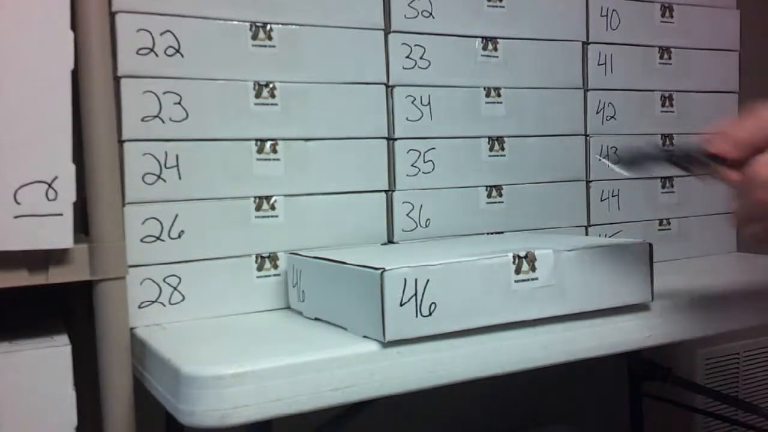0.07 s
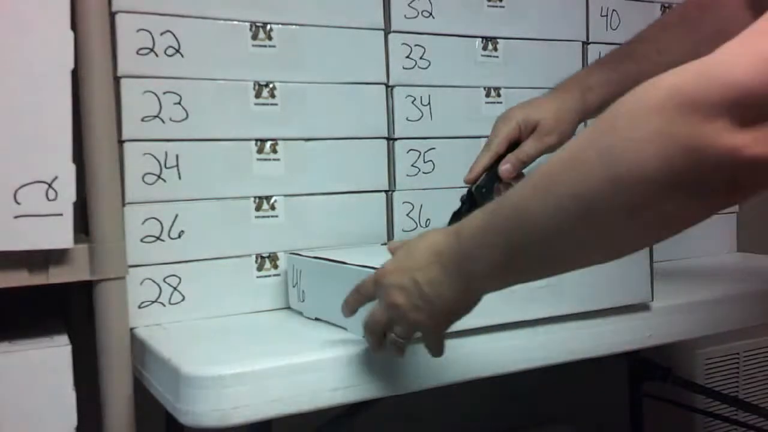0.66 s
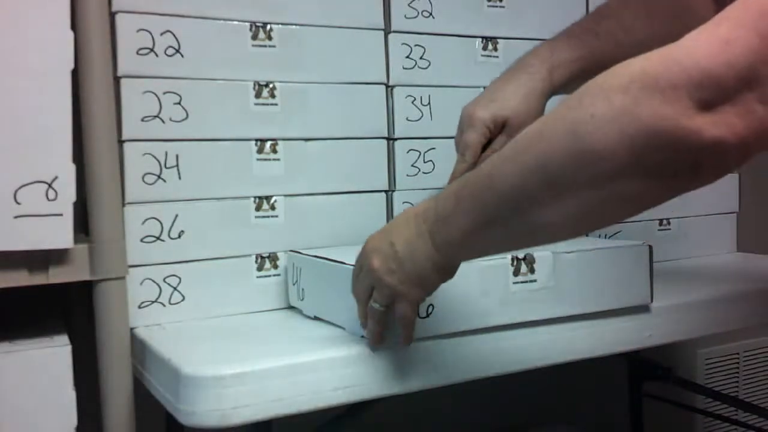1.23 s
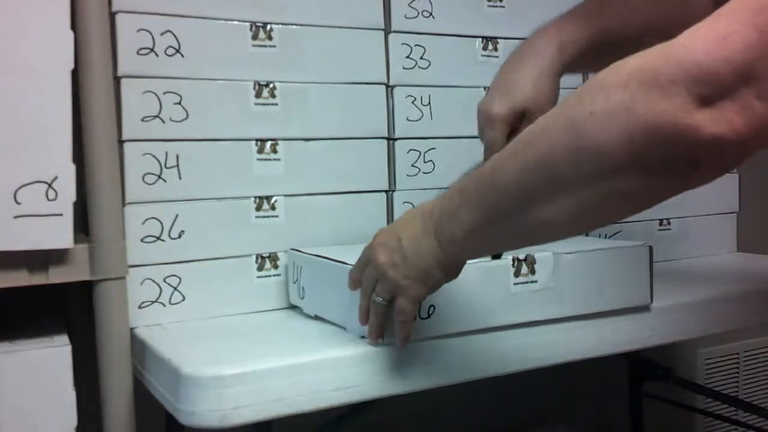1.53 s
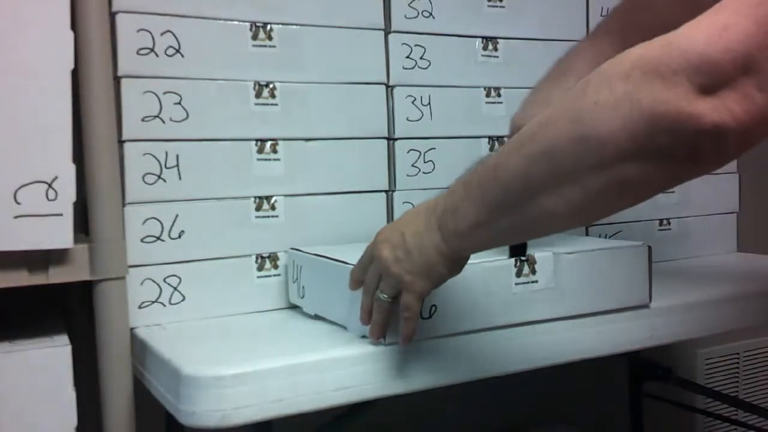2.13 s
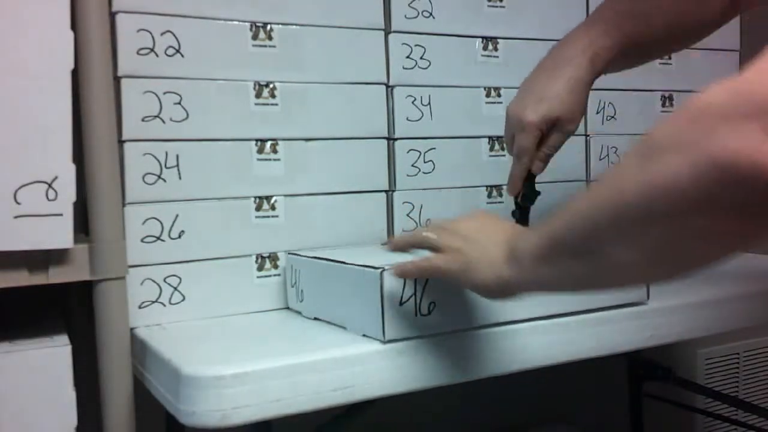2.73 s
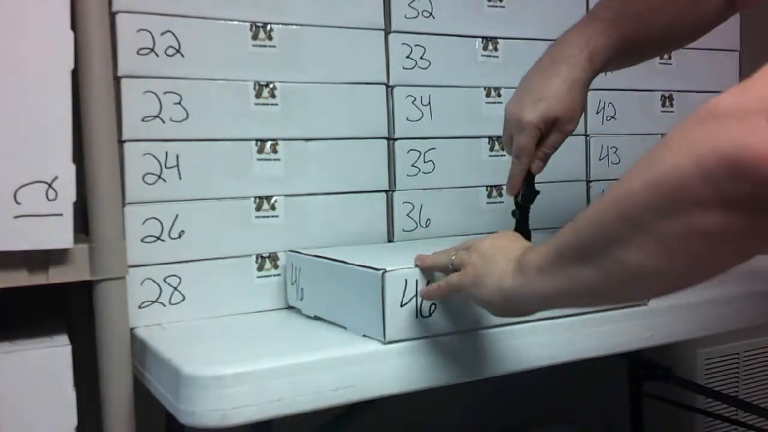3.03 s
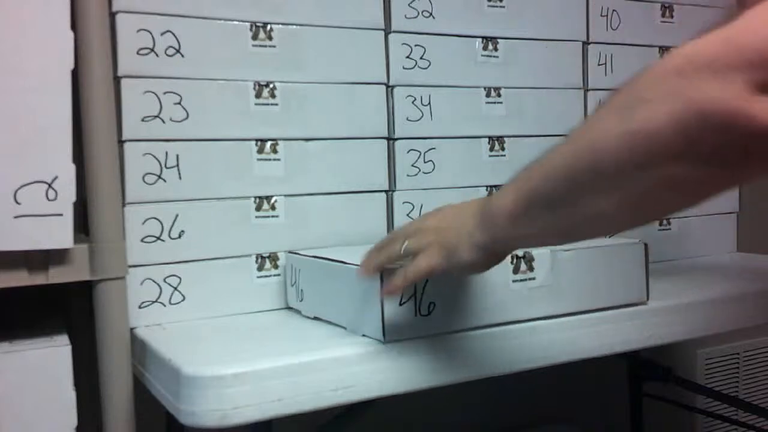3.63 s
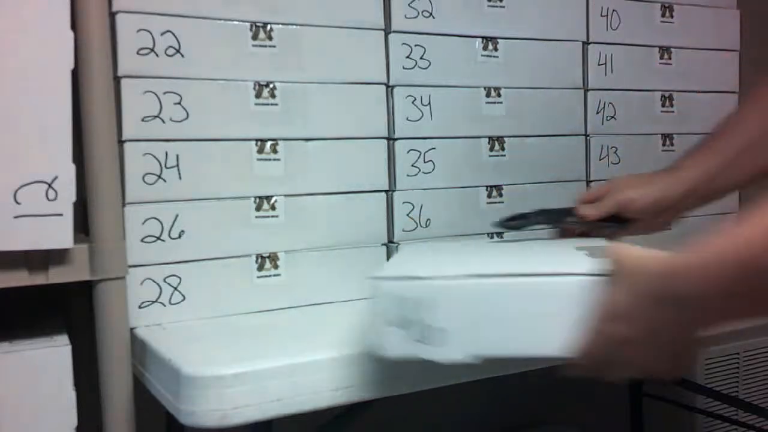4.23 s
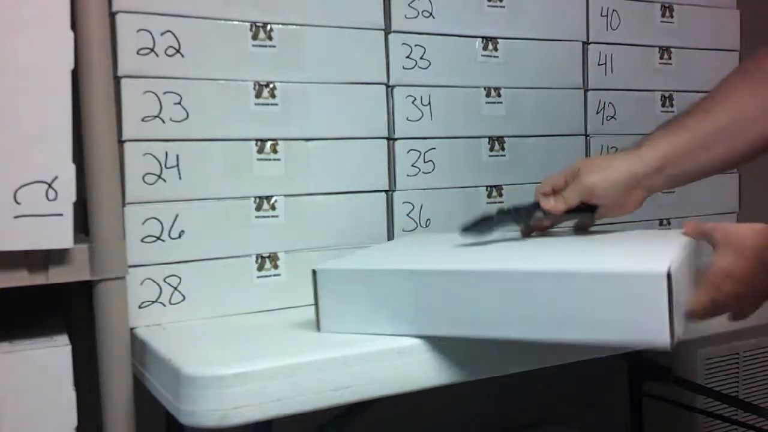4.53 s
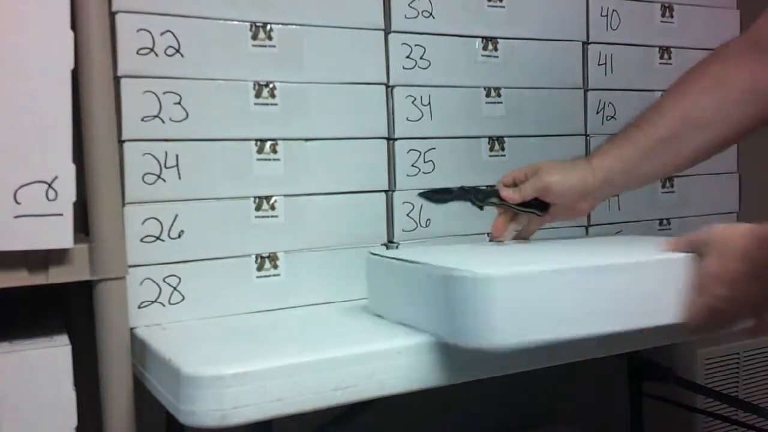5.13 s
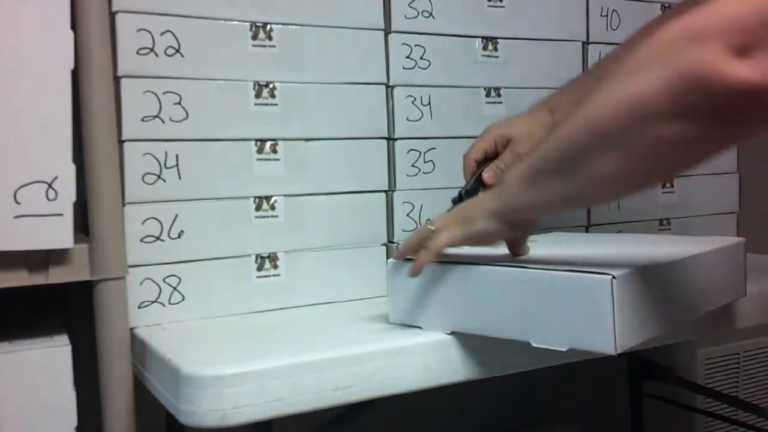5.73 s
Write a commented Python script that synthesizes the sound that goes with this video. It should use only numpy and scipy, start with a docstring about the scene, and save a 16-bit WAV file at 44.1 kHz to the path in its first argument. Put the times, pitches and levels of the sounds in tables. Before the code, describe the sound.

A hand softly rubs a shallow cardboard box, then a knife slits its tape in short rasps and goes through the seam with a hollow pop. After a few smaller cuts and a lull, the box is swung round on a plastic table in several louder scraping pushes, with bumps and brief squeaks. It is all close to the microphone in a small room with a faint fan hum.

```python
"""A shallow cardboard box, slit open and swung round on a plastic table, close to one microphone.
A hand steadies the box while a knife slits its tape and pops through the seam; then the box goes
round in several scraping pushes, bumping down between them. Fibres catch and slip to make the rasp,
and the walls and the table top ring under each bump. The place is a small store room with a short
echo; a fan hums in the background, over the microphone's faint hiss."""
import sys
import numpy as np
from scipy import signal
from scipy.fft import rfft, irfft, next_fast_len
from scipy.io import wavfile

SR = 44100
rng = np.random.default_rng(int(sys.argv[2]) if len(sys.argv) > 2 else 0)


def file_out(sig):
    """Save sig as 16-bit WAV at sys.argv[1]."""
    # one column per channel
    cols = np.atleast_2d(sig).T
    # limit, then scale
    lim = np.clip(cols, -1, 1)
    pcm = np.round(lim * 32767).astype(np.int16)
    wavfile.write(sys.argv[1], SR, pcm)


N = 255339
TIME = np.arange(N) / SR


def from_db(db):
    """Decibels to gain."""
    return 10 ** (np.asarray(db) / 20)


def unit_rms(x):
    """Scale to an rms of 1."""
    return x / np.sqrt(np.mean(x ** 2) + 1e-20)


def at_hz(points, hz):
    """Read a table on a log-frequency axis."""
    points = np.array(points)
    return np.interp(np.log(hz + 1e-6), np.log(points[:, 0]), points[:, 1])


def butter(x, hz, kind, order=2):
    """Butterworth filter."""
    sections = signal.butter(order, np.clip(hz, 10, .45 * SR), kind, fs=SR, output="sos")
    return signal.sosfilt(sections, x + 1e-18)


def coloured(x, spectrum):
    """Give a steady excitation a spectrum, at an rms of 1."""
    size = next_fast_len(N)
    hz = np.arange(size // 2 + 1) * SR / size
    shaped = rfft(x, size) * from_db(at_hz(spectrum, hz))
    return unit_rms(irfft(shaped, size)[:N])


def drift(per_s):
    """A random wander with a spread near 1."""
    knots = rng.standard_normal(6000)
    return np.interp(TIME * per_s, np.arange(len(knots)), knots)


def swell(middle_s, length_s):
    """A bell-shaped rise and fall."""
    return np.exp(-np.minimum((2 * (TIME - middle_s) / length_s) ** 2, 20))


def narrow_noise(phase, width_hz):
    """A resonance fed by friction: its strength and phase wander."""
    return drift(width_hz) * np.sin(phase) + drift(width_hz) * np.cos(phase)


def ring(force, modes):
    """Damped modes in parallel, in alternating phase; their levels count relative to each other."""
    out = 0
    for k, (hz, db, t60) in enumerate(modes):
        radius, angle = from_db(-60 / (t60 * SR)), 2 * np.pi * hz / SR
        feedback = [1, -2 * radius * np.cos(angle), radius * radius]
        mode = signal.lfilter([.5, 0, -.5], feedback, force + 1e-18)
        out += (-1) ** k * from_db(db) * mode
    return out / np.sqrt(sum(from_db(db) ** 2 for _, db, _ in modes))


def diffuse_echo(t60s, onset_s=0.00088):
    """An enclosure's response, of unit energy: octave bands of noise, each with its own decay."""
    t = TIME[:SR // 2]
    edges_hz = 60 * 2. ** np.arange(10)
    out = 0
    for low, high in zip(edges_hz, edges_hz[1:]):
        band = butter(rng.standard_normal(len(t)), (low, high), "band")
        out += band * from_db(-60 * t / at_hz(t60s, np.sqrt(low * high)))
    out *= 1 - np.exp(-t / onset_s)
    return out / np.sqrt(np.sum(out ** 2))


# Noise floor of the microphone: f/Hz, relative density/dB
MIC_HISS = [(1760, -33), (3000, -31), (3620, -4), (3960, -12), (5450, -11.5), (7600, -17.5), (8210, -10),
            (15800, -4.5)]

def microphone_hiss(level_db=-71.5):
    """The microphone's own noise, even and high."""
    hiss = coloured(rng.standard_normal(N), MIC_HISS)
    return from_db(level_db) * unit_rms(butter(hiss, 2600, "high", order=4))


# The fan, in the background of the store room. Its hum: f/Hz, relative level/dB
FAN_HUM = [(236.9, -73.5), (296.1, -67.5), (360.7, -77), (419.9, -77.5), (479.1, -78), (656.8, -76.5),
           (952.8, -114), (1432, -76), (1491, -76.5), (1556, -83), (1852, -83.5), (2444, -77.5)]
# Its rush of air: f/Hz, relative density/dB
FAN_RUSH = [(18, -40), (30, -24), (59, -12.5), (204, -13), (233, -3), (268, -20), (301, -5.5), (325, -18),
            (352, -4.5), (388, -13.5), (481, -11), (972, -13.5), (1140, -18), (1460, -14.5), (3200, -19.5),
            (4160, -64), (7040, -120)]

def fan(hum_db=-2.0, waver_db=-4.0, rush_db=-65.5):
    """A fan hums in wavering tones over a dull rush of air."""
    hum = 0
    for hz, db in FAN_HUM:
        gain = from_db(db + hum_db + waver_db * drift(3.48))
        phase = 2 * np.pi * hz * TIME + .5 * drift(2.6)
        hum += gain * np.sqrt(2) * np.sin(phase)
    rush = coloured(rng.standard_normal(N), FAN_RUSH)
    return hum + from_db(rush_db) * butter(rush, 2720, "low", order=6)


# A fingertip on a wall of the box: middle t/s, length/s, f/Hz at full force, level/dB
FINGER_GROANS = [(0.924, 0.07, 295, -37), (0.993, 0.048, 300, -51.5), (1.089, 0.034, 306, -52.5),
                 (1.144, 0.027, 285, -56.5), (1.179, 0.021, 340, -51)]

def finger_groans(waver=0.061, sag=0.11, octave_db=-29):
    """Stick-slip locks to a wall mode: an almost pure tone whose pitch sags as the force fades."""
    unsteady = 1 + waver * drift(100)
    out = 0
    for s, length, hz, db in FINGER_GROANS:
        force = swell(s, length)
        pitch_hz = hz * unsteady * (1 - sag * (1 - force))
        phase = 2 * np.pi * np.cumsum(pitch_hz) / SR
        tone = np.sin(phase) + from_db(octave_db) * np.sin(2 * phase)
        out += from_db(db) * force * np.sqrt(2) * tone
    return out


# Blade on tape and board on plastic: middle t/s, length/s, f/Hz, width/Hz, level/dB
FRICTION_SQUEAKS = [(0.788, 0.08, 2200, 995, -61), (1.17, 0.097, 3000, 130, -61.5),
                    (1.2, 0.13, 3400, 109.3, -71), (1.508, 0.015, 1210, 400, -34),
                    (1.525, 0.013, 2500, 406, -33), (2.67, 0.033, 795, 159.8, -39),
                    (4.447, 0.18, 1270, 119.3, -52), (4.589, 0.04, 1620, 300, -52),
                    (4.644, 0.033, 3500, 1000, -39), (4.773, 0.083, 1273, 199.4, -47),
                    (4.81, 0.22, 3350, 301.6, -62), (4.948, 0.06, 2585, 548, -29),
                    (4.943, 0.048, 4870, 700, -39.5), (4.96, 0.096, 1354, 129, -38.5),
                    (4.952, 0.065, 6800, 910, -43.5), (5.117, 0.023, 880, 111.3, -28)]

def squeaks():
    """For a moment the slips gather round one pitch and ring in a narrow, unsteady band."""
    return sum(from_db(db) * swell(s, length) * narrow_noise(2 * np.pi * hz * TIME, width_hz)
               for s, length, hz, width_hz, db in FRICTION_SQUEAKS)


# The blade's tip touching the box: t/s, relative level/dB
BLADE_TICKS = [(2.188, -30), (3.211, -35), (3.224, -39.5)]
# The board's higher modes: f/Hz, relative level/dB, t60/s
BOARD_MODES = [(740, 0.5, 0.093), (1005, -11.5, 0.15), (1114, 1.5, 0.13), (1217, 2, 0.051),
               (1960, -5.5, 0.063), (2250, -9, 0.098), (2950, -7, 0.088), (3100, -16, .09),
               (4030, -26, .07)]

def blade_ticks(ring_db=-6, scratch_db=-9, scratch_s=0.013, fibres_db=-19):
    """A hard point rings the board, with a brief scratch and a thin hiss of fibres."""
    clicks = np.zeros(N)
    for s, db in BLADE_TICKS:
        clicks[round(s * SR)] = from_db(db)
    decay = signal.lfilter([1], [1, -np.exp(-1 / (scratch_s * SR))], clicks + 1e-18)
    friction = decay * slips(spread_db=1.7)
    ringing = from_db(ring_db) * ring(clicks, BOARD_MODES)
    scratch = from_db(scratch_db) * butter(friction, (650, 3200), "band", order=1)
    fibres = from_db(fibres_db) * butter(friction, 9000, "high", order=1)
    return butter(ringing + scratch, 3800, "low") + fibres


def flex(hz, rise_s, delay_s=0):
    """A struck spot gives: its swing builds up and dies within a few cycles."""
    t = np.maximum(TIME[:SR // 10] - delay_s, 0)
    return (t / rise_s) ** 2 * np.exp(2 - 2 * t / rise_s) * np.sin(2 * np.pi * hz * t)


# Modes of the box walls and of the table top under them: f/Hz, relative level/dB, t60/s
WALL_MODES = [(178.4, 2, 0.091), (184, 3.5, 0.13), (206.6, 7, 0.13), (247.9, 7, 0.098), (288, -4.5, 0.091),
              (342.4, 3, 0.12), (425, -9, 0.11), (550, -7.5, 0.037), (664, -14.5, 0.089), (692, 3.5, .07),
              (816, 6.5, 0.15), (1010, -34, .1), (1380, -27, 0.15)]
TABLE_MODES = [(64, -27, .2), (82.7, 16, 0.09), (97, -7.5, 0.13), (141, 9, 0.068)]
# Hand, blade and table knocking the box: t/s, level/dB, flexing f/Hz, table thump level/dB
BOX_BUMPS = [(0.86, -40.5, 250, -66), (0.884, -38.5, 175, -51), (1.527, -31.5, 200, -39),
             (1.558, -27.5, 367, -51), (1.819, -37.5, 220, -42), (1.863, -42, 314, -65),
             (1.971, -28, 240, -70), (1.982, -27.5, 304, -64), (2.004, -25, 734, -54),
             (2.0104, -18.5, 246, -50), (2.019, -16, 342, -31), (2.041, -25.5, 297, -40),
             (2.092, -23, 300, -39), (2.209, -36.5, 230, -33), (2.253, -44, 257, -59),
             (2.34, -44.5, 244, -70), (2.612, -41.5, 208, -56), (2.861, -43, 249, -57),
             (2.982, -43, 279, -68), (3.469, -48, 246, -75), (3.718, -49, 206, -50.5),
             (3.861, -23, 217, -28.5), (3.906, -37, 177, -45), (4.077, -32.5, 230, -36),
             (4.205, -26, 227, -42), (4.636, -25, 230, -22.5), (4.661, -17.5, 643, -41),
             (4.672, -15.5, 255, -23.5), (4.682, -25.5, 405, -36), (4.72, -37, 184, -37),
             (4.975, -30, 457, -52), (4.977, -19.5, 232, -28.5), (5.012, -22.5, 274, -54),
             (5.192, -40, 240, -45), (5.504, -35.5, 280, -68), (5.518, -32, 216, -52),
             (5.735, -54.5, 259, -42.5)]

def bumps(rise_s=0.0042, settle_db=-6.5, table_hz=86, wall_ring_db=-41.5, table_ring_db=-44.0):
    """The spot that is hit flexes, settles, and hands its motion on to the walls and the table top."""
    on_box, on_table = np.zeros(N), np.zeros(N)
    for s, db, hz, table_db in BOX_BUMPS:
        start = round(s * SR)
        settling = from_db(settle_db) * flex(hz * 0.825, rise_s, delay_s=0.0161)
        knock = from_db(db) * (flex(hz, rise_s) + settling)
        thump = from_db(table_db) * flex(table_hz, rise_s=0.0058)
        on_box[start:start + len(knock)] += knock[:N - start]
        on_table[start:start + len(thump)] += thump[:N - start]
    walls = from_db(wall_ring_db) * ring(on_box, WALL_MODES)
    table = from_db(table_ring_db) * ring(on_table, TABLE_MODES)
    return on_box + on_table + walls + table


# Strokes of blade, hand and box; rise and fall each span 20 dB. Columns: full force from t/s,
# rise/s, hold/s, fall/s, rasp level/dB, relative hiss level/dB, kind of contact
CONTACT_STROKES = [ (0.777, 0.11, 0.03, 0.065, -65.5, -68, "tip"),
                   (0.868, 0.019, 0.011, 0.042, -54.5, -85, "hand"),
                   (1.145, 0.12, .06, 0.32, -63.5, -79, "tip"),
                   (1.504, 0.011, 0.06, 0.051, -36.5, -50, "slit"),
                   (1.52, 0.0065, 0.0024, 0.062, -32.5, -33, "slit"),
                   (1.679, 0.046, .03, .06, -52.5, -55, "slit"),
                   (1.805, 0.034, 0.011, 0.055, -37, -43, "seam"),
                   (1.917, 0.035, 0.082, 0.07, -56, -54.5, "seam"),
                   (2.004, 0.013, 0.0077, 0.03, -19.5, -27, "pop"),
                   (2.03, 0.034, .015, 0.16, -45, -47.5, "slit"),
                   (2.087, 0.025, 0.0096, 0.052, -38.5, -56, "pop"),
                   (2.188, 0.0055, 0.0052, 0.071, -47, -42, "saw"),
                   (2.22, .06, 0.04, 0.035, -42.5, -71, "saw"),
                   (2.32, 0.021, 0.035, .06, -62.5, -57.5, "saw"),
                   (2.353, 0.014, .028, 0.023, -53.5, -67, "seam"),
                   (2.506, 0.032, 0.014, 0.077, -67, -62.5, "withdraw"),
                   (2.672, 0.08, .016, 0.063, -46, -54.5, "withdraw"),
                   (2.997, 0.071, 0.026, 0.096, -60, -66.5, "hand"),
                   (3.128, .04, .025, 0.044, -72, -68.5, "tip"),
                   (3.479, 0.029, 0.016, 0.074, -64.5, -64, "tip"),
                   (3.848, 0.062, 0.059, 0.074, -29, -34, "shove"),
                   (4.001, 0.016, 0.014, 0.068, -52, -45, "shove"),
                   (4.199, 0.083, 0.058, 0.22, -29.5, -38.5, "swing"),
                   (4.408, 0.018, 0.0062, 0.031, -55, -59, "swing"),
                   (4.456, 0.031, 0.042, 0.029, -42.5, -50, "swing"),
                   (4.575, 0.036, 0.03, 0.066, -52.5, -47, "swing"),
                   (4.64, 0.017, 0.008, 0.059, -35, -41.5, "swing"),
                   (4.671, 0.032, 0.0088, 0.056, -22, -38, "skid"),
                   (4.746, .05, 0.0086, 0.22, -51, -81, "swing"),
                   (4.933, 0.031, 0.05, 0.062, -33, -39.5, "grip"),
                   (5.018, 0.014, 0.0065, 0.11, -36.5, -42, "grip"),
                   (5.101, 0.13, 0.15, 0.084, -32.5, -41, "slide"),
                   (5.193, 0.018, 0.018, 0.019, -33, -57, "skid"),
                   (5.294, 0.03, 0.018, 0.042, -41, -61, "slide"),
                   (5.516, 0.038, 0.02, 0.062, -61, -74, "hand"),
                   (5.732, 0.031, 0.02, 0.051, -58, -62.5, "hand"), ]

def effort(contact, rounding=1.17, lag_s=.001):
    """Pressure and speed of one contact's strokes: the hand presses first, then gathers speed."""
    pressure, speed = np.zeros(N), np.zeros(N)
    for s, rise, hold, fall, rasp_db, hiss_db, kind in CONTACT_STROKES:
        if kind == contact:
            off_plateau = np.maximum((s - TIME) / rise, 0) + np.maximum((TIME - s - hold) / fall, 0)
            audible = off_plateau < 3
            shape = from_db(-20 * off_plateau[audible] ** rounding)   # drops gently, then ever faster
            pressure[audible] += from_db(rasp_db) * shape
            speed[audible] += from_db(hiss_db) * shape
    return pressure, np.interp(TIME - lag_s, TIME, speed)


def bottom_panel(centre_hz=956, wander=.11, shifts_per_s=16, width_hz=170, ring_db=-11):
    """The bottom of the sliding box rings in a band that wanders as the box turns on its edge."""
    pitch_hz = centre_hz * (1 + wander * drift(shifts_per_s))
    phase = 2 * np.pi * np.cumsum(pitch_hz) / SR
    pressure = sum(effort(contact)[0] for contact in ("shove", "swing", "slide"))
    return from_db(ring_db) * pressure * narrow_noise(phase, width_hz)


def slips(spread_db, per_s=7000, smooth=0.32, judder_db=0.8, judder_per_s=130):
    """Fibres catch and let go: dense clicks of uneven size that come in clumps."""
    sizes = from_db(spread_db * np.minimum(rng.exponential(1, N), 4))
    signs = rng.choice([-1, 1], N)
    slipping = rng.random(N) < per_s / SR
    force = unit_rms(sizes * signs * slipping) + smooth * rng.standard_normal(N)
    return unit_rms(force * from_db(judder_db * drift(judder_per_s)))


def drumming(force, table_db=-16.0):
    """Only the slow part of a force bends the walls and the table top."""
    ringing = ring(force, WALL_MODES) + from_db(table_db) * ring(force, TABLE_MODES)
    return butter(ringing, 484, "low")


# Colour of each contact, close to the microphone: f/Hz, relative density/dB. The knife:
TIP_TONE = [(400, -9), (900, -4), (1500, -4), (2200, -2), (3200, -1), (3700, -12), (7000, -20),
            (15000, -14)]
SLIT_TONE = [(210, -32), (350, 6.5), (391, 8), (481, -8), (583, -1), (801, -6.5), (970, 0), (1170, -9),
             (2120, -16.5), (2480, -22), (2730, -19.5), (5780, -27.5), (7570, -32), (12600, -21.5),
             (15800, -21.5)]
SEAM_TONE = [(210, -38), (350, -14), (505, -14), (673, 1.5), (955, -8.5), (1250, -6), (1640, -21),
             (2520, -17), (4130, -31), (5510, -27), (7220, -31.5), (12400, -20), (15800, -18.5)]
POP_TONE = [(400, 5), (500, -15), (700, 5), (860, -16.5), (1120, -3.5), (1500, -24), (1820, -9),
            (2200, -23), (2700, -11.5), (3100, -21.5), (3650, -15), (4300, -30.5), (8000, -32.5),
            (13000, -26.5), (15800, -24.5)]
SAW_TONE = [(210, -45), (350, -32), (404, -17), (556, -9), (705, 8.5), (970, -12), (1210, -5),
            (1670, -21.5), (4340, -29.5), (6770, -30), (7700, -33), (12400, -23.5), (15800, -30)]
WITHDRAW_TONE = [(210, -42), (350, 4.5), (530, -18), (728, -13), (814, -2), (896, -19), (1000, -19),
                 (1290, -13), (1420, -17), (2480, -24), (4340, -30), (10800, -20), (15800, -24)]
# The box on the table, and the hand on the box:
SHOVE_TONE = [(210, -38), (350, -28), (385, 6), (437, -4), (474, -5), (764, -5), (970, -4), (1270, -4),
              (1690, -13.5), (2560, -10), (4130, -15.5), (5600, -9), (7700, -11), (9320, -3), (15800, -4)]
SWING_TONE = [(210, 3), (350, 9.5), (497, 0.5), (547, 2), (662, -1.5), (752, 4), (1020, -2), (1310, 7),
              (1620, -8.5), (1810, -1), (1960, -7.5), (2330, -6), (7700, -29), (10300, -22), (15800, -25)]
SKID_TONE = [(210, -47), (350, -18), (398, 18.5), (437, -20), (474, -2), (641, 4.5), (752, -20), (827, 6),
             (910, -4.5), (1030, -4.5), (1670, -17.5), (2650, -16), (2910, -21.5), (4930, -34),
             (15800, -46)]
GRIP_TONE = [(210, -68), (350, -18), (474, -14), (574, -5), (651, -4), (801, -8), (1230, -2), (1360, -8.5),
             (1810, -6), (2600, -1.5), (3530, -13.5), (5010, -14), (5780, -14.5), (6770, -19), (15800, -17)]
SLIDE_TONE = [(210, -47), (350, -6.5), (410, -10), (521, -4), (728, -9), (868, 1), (940, -11.5), (1190, -5),
              (2080, -18.5), (2600, -13.5), (2870, -20.5), (7110, -30.5), (7940, -36), (9470, -29.5),
              (15800, -29.5)]
HAND_TONE = [(400, 18), (1000, 10), (2300, -1), (3600, -11.5), (6000, -27.5), (8000, -31), (15000, -20.5)]
# Kinds of contact: colour, drumming level/dB relative to the rasp, spread of slip sizes/dB
CONTACTS = {"tip": (TIP_TONE, -6, 4.5), "slit": (SLIT_TONE, -8.5, 3.9), "seam": (SEAM_TONE, -5, 2.1),
            "pop": (POP_TONE, 1.6, 3.2), "saw": (SAW_TONE, -5, 4),
            "withdraw": (WITHDRAW_TONE, -12.5, 4.5), "shove": (SHOVE_TONE, -10.5, 4.5),
            "swing": (SWING_TONE, -14, 4.1), "skid": (SKID_TONE, -2, 3.9),
            "grip": (GRIP_TONE, -14.5, 4.5), "slide": (SLIDE_TONE, -17.5, 4.5),
            "hand": (HAND_TONE, -1.5, 4.5)}

def cardboard_scrapes(hiss_db=-1.5, hollowness=1.32, shift_hz=5):
    """Slips rasp in the board, hiss at the contact and set the walls and the table drumming."""
    inside_t60 = [(300, 0.076), (2500, 0.05), (12000, 0.053)]   # echoes within the box: f/Hz, t60/s
    spots = [diffuse_echo(inside_t60) for _ in range(2)]
    # The moving contact favours now one spot's resonances, now the other's.
    travel = 2 * np.pi * shift_hz * TIME
    shares = np.sin(travel), np.cos(travel)
    out, shaking = 0, 0
    for contact, (colour, drum_db, spread_db) in CONTACTS.items():
        force = slips(spread_db)
        echoes = sum(signal.oaconvolve(force * share, spot)[:N] for share, spot in zip(shares, spots))
        friction = coloured(force + hollowness * echoes, colour)
        rasp = unit_rms(butter(friction, (400, 4300), "band", order=4))
        hiss = unit_rms(butter(friction, 5420, "high", order=4))
        pressure, speed = effort(contact)
        out += pressure * rasp + from_db(hiss_db) * speed * hiss
        shaking += from_db(drum_db) * pressure * force
    drum_gain = np.std(drumming(rng.standard_normal(N)))
    return out + drumming(shaking) / drum_gain


# The small store room around the table: f/Hz, t60/s
STORE_ROOM_T60 = [(100, 0.28), (400, 0.078), (1200, 0.3), (4000, 0.043), (14000, 0.73)]

def scene(scrape_wet_db=-18.0, bump_wet_db=-4.5, tick_wet_db=-5.5):
    """At the microphone, in mono: the box close up, the room's echo and the fan behind it."""
    scrape = cardboard_scrapes() + bottom_panel() + squeaks()
    bump, tick = bumps(), blade_ticks()
    send = from_db(scrape_wet_db) * scrape + from_db(bump_wet_db) * bump + from_db(tick_wet_db) * tick
    room = signal.oaconvolve(send, diffuse_echo(STORE_ROOM_T60))[:N]
    return (scrape + bump + tick + finger_groans() + room + fan() + microphone_hiss())[None]


def record(dry):
    """The deepest bass is rolled off and the top is cut steeply."""
    low_cut_hz, high_cut_hz = 72, 15850
    high_cut = signal.ellip(12, .1, 80, high_cut_hz, fs=SR, output="sos")
    return signal.sosfilt(high_cut, butter(dry, low_cut_hz, "high", order=3))


dry = scene()
out = record(dry)
file_out(out)
```